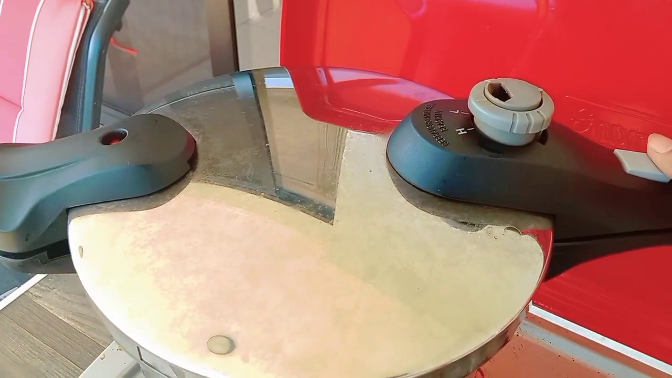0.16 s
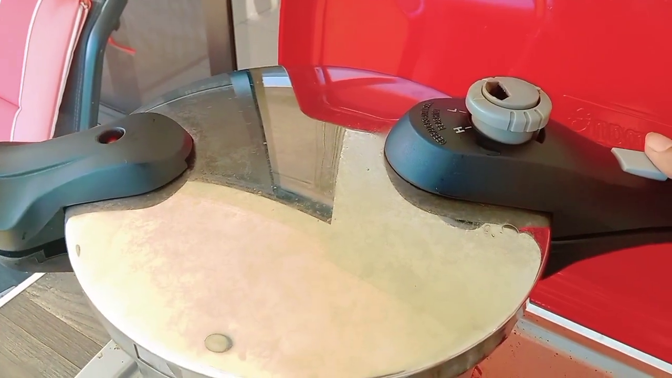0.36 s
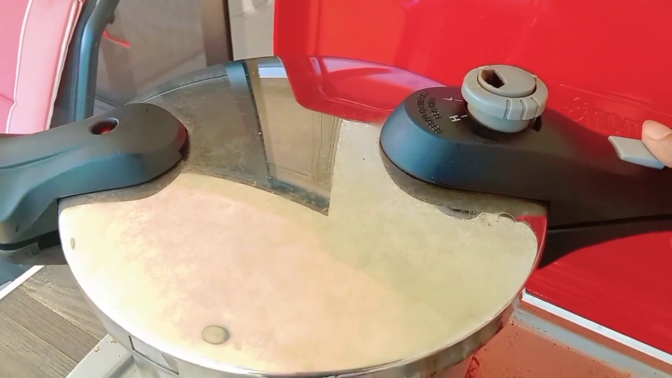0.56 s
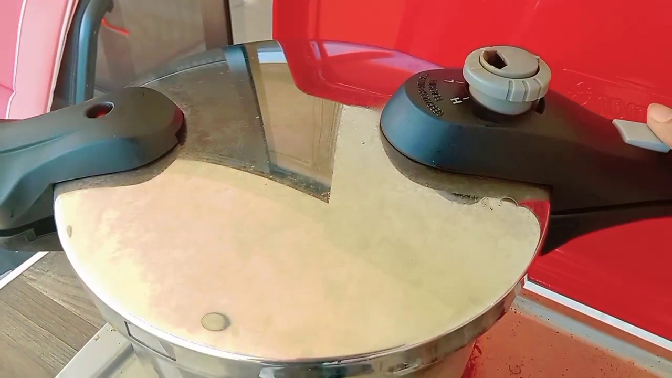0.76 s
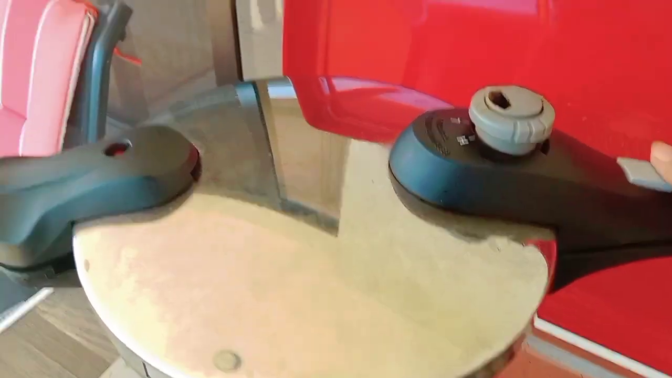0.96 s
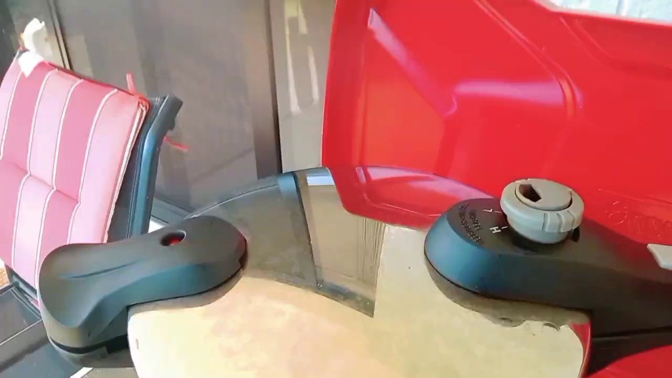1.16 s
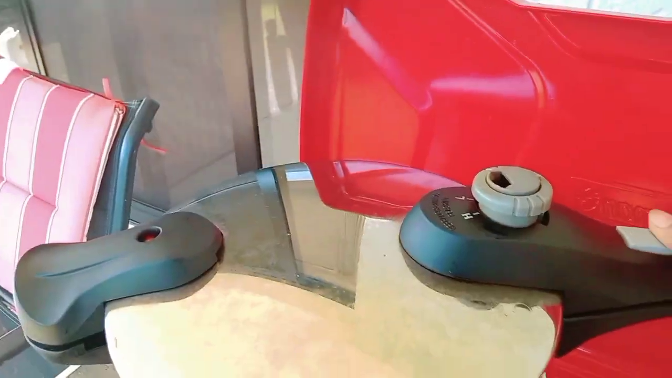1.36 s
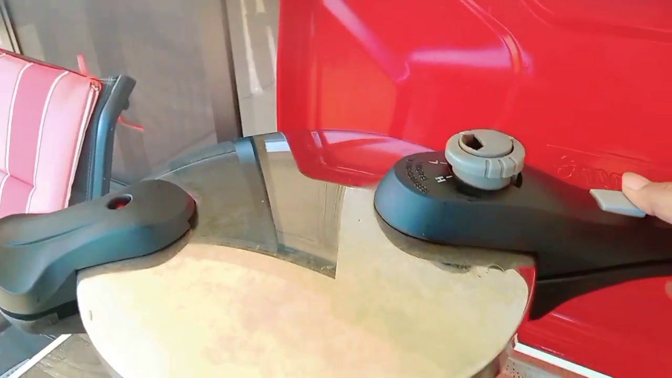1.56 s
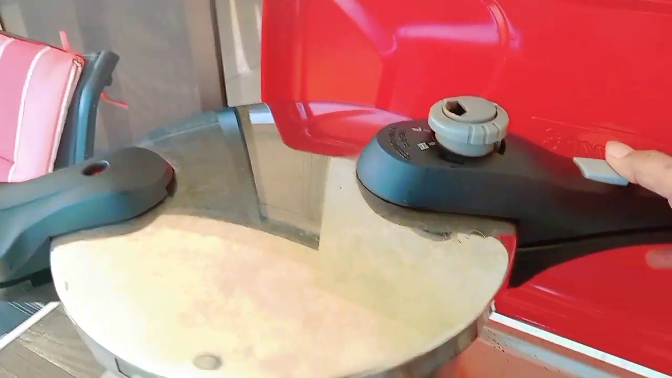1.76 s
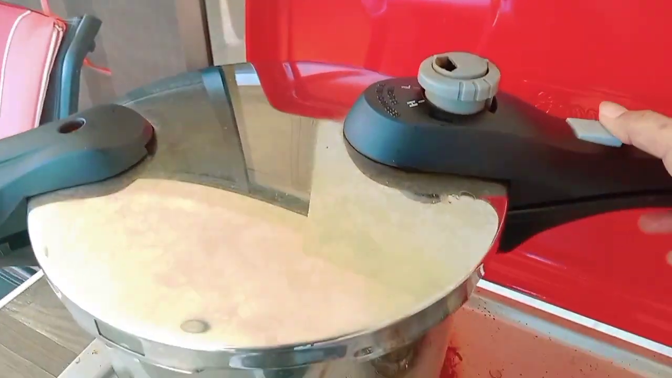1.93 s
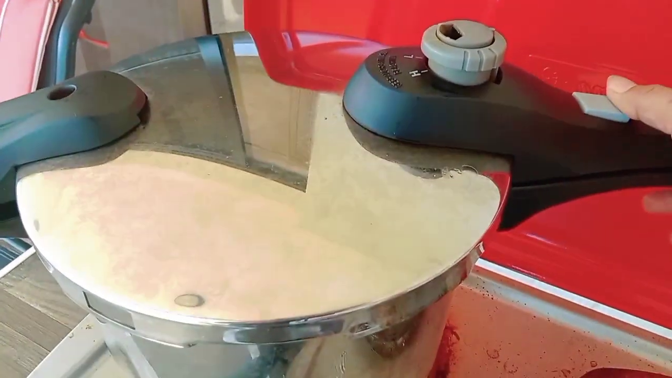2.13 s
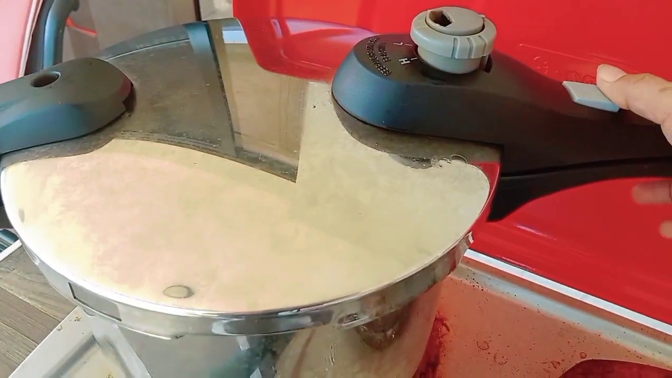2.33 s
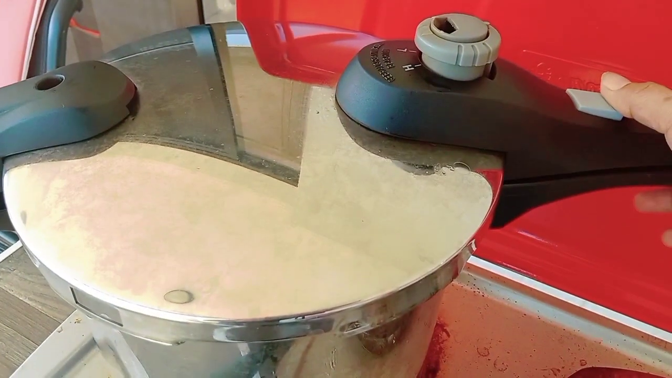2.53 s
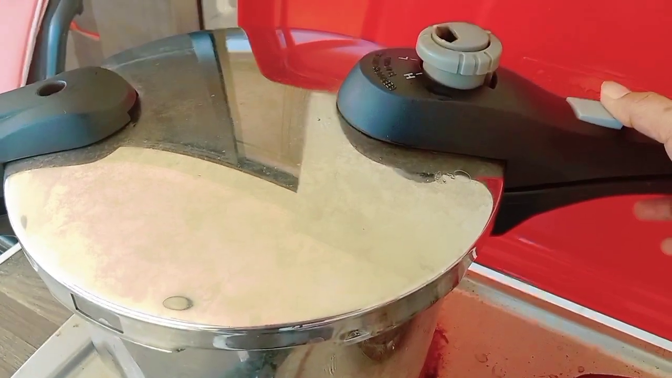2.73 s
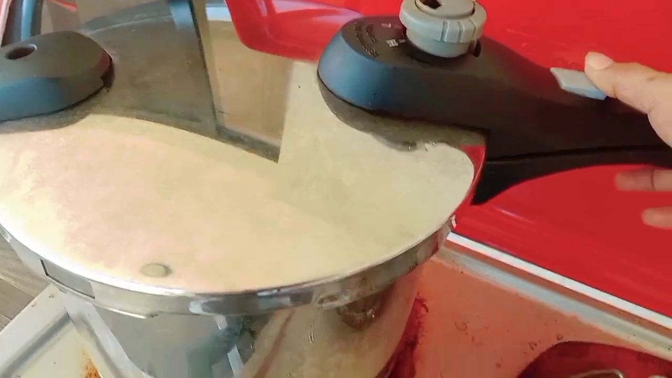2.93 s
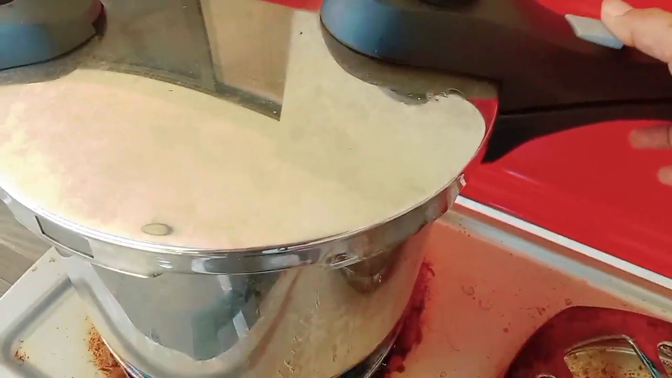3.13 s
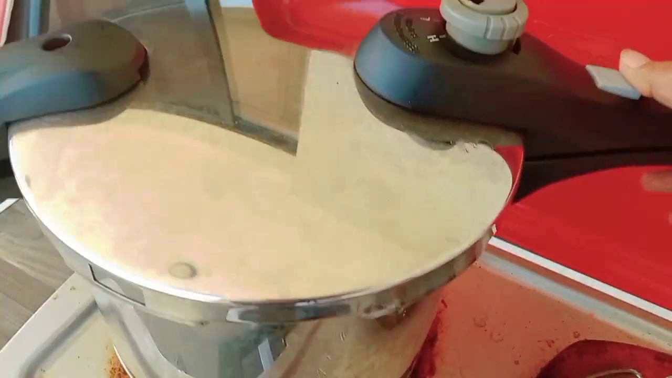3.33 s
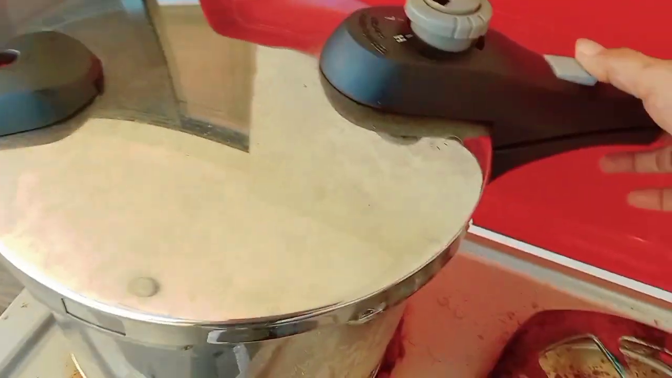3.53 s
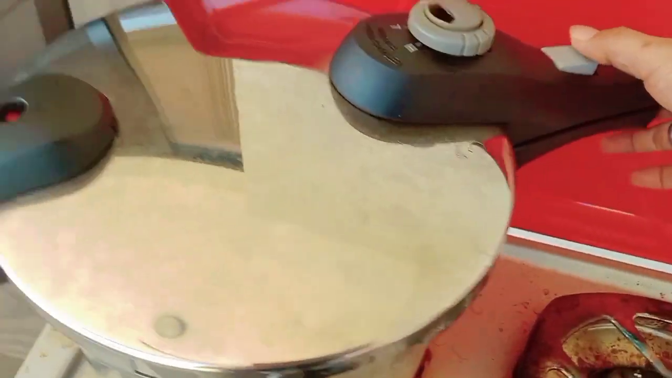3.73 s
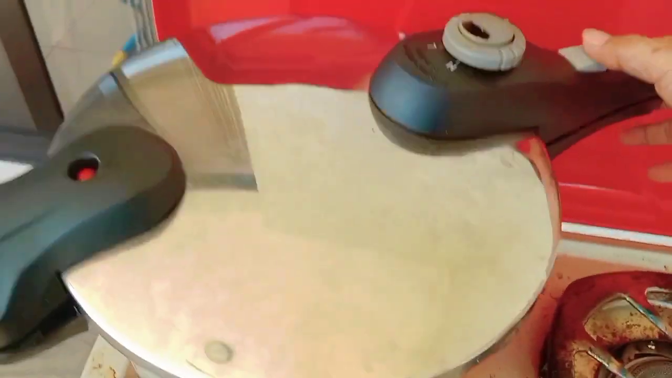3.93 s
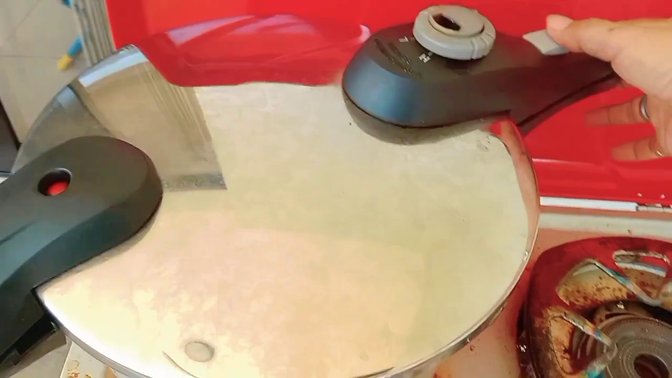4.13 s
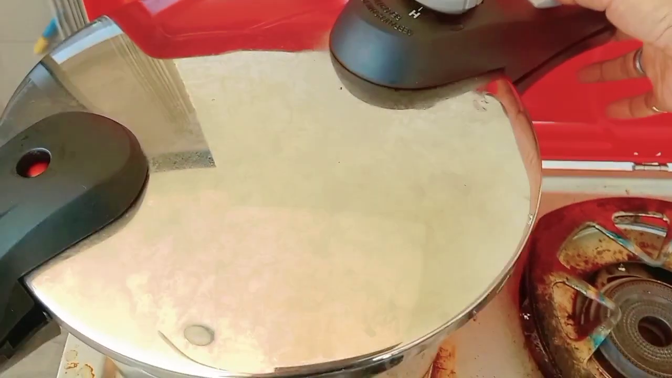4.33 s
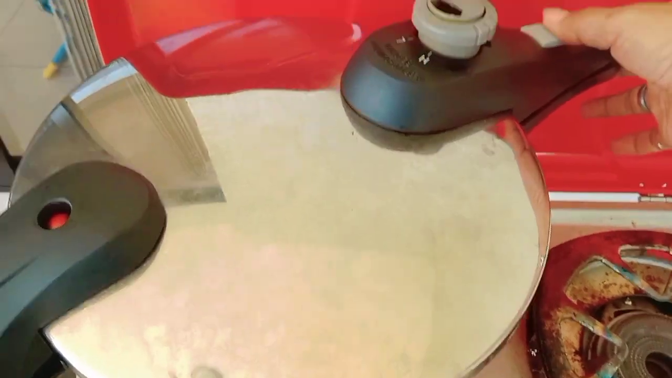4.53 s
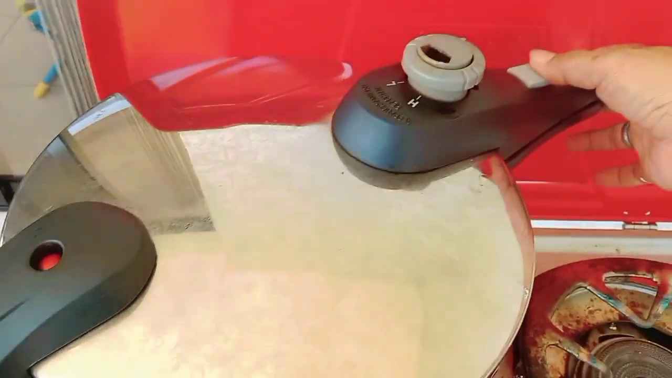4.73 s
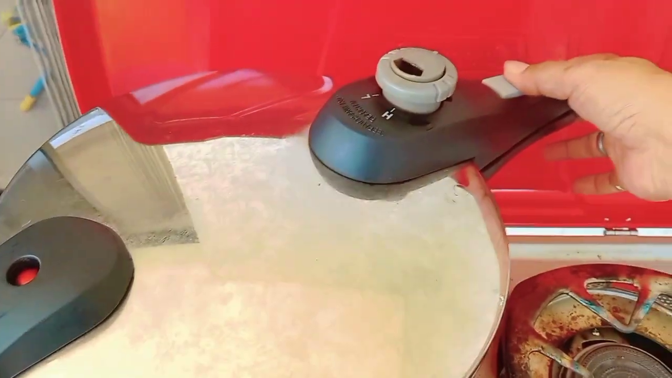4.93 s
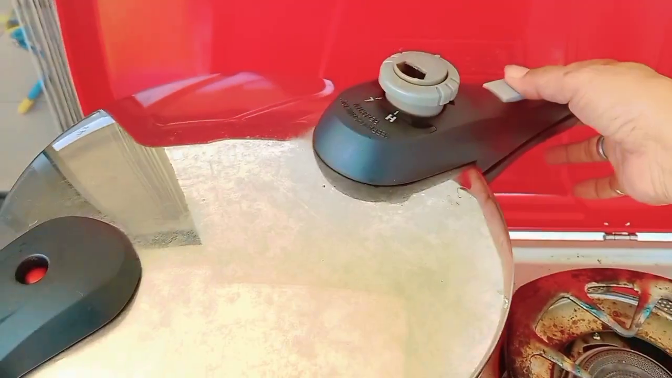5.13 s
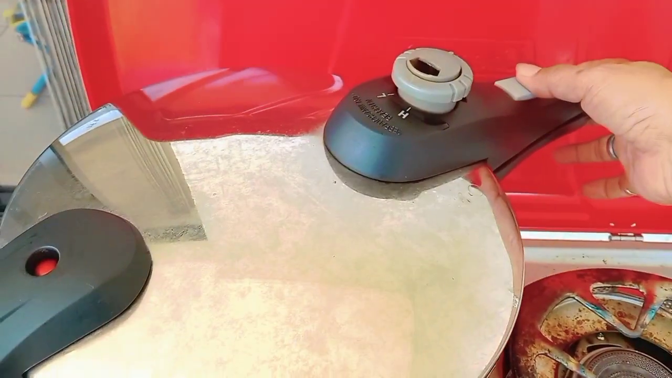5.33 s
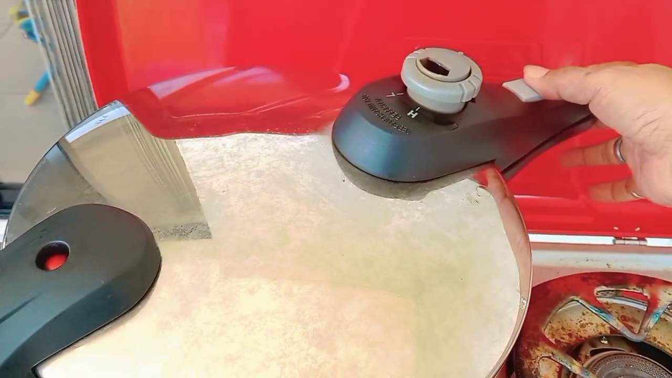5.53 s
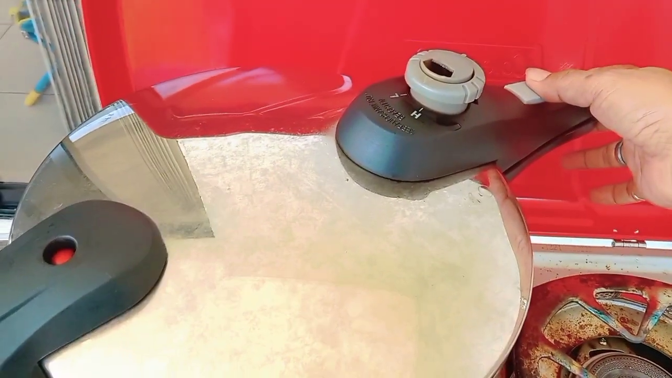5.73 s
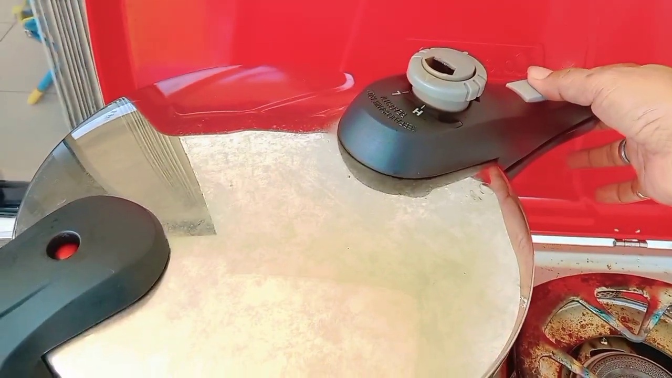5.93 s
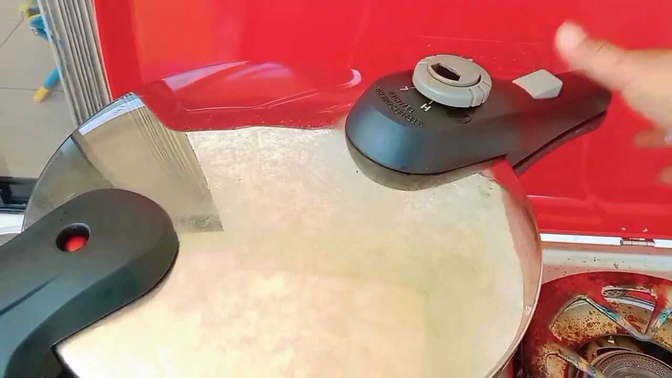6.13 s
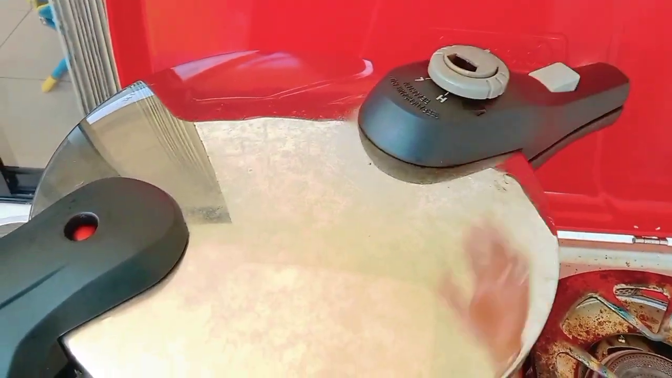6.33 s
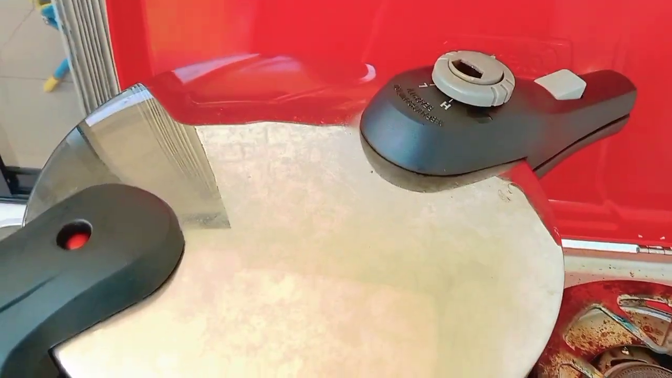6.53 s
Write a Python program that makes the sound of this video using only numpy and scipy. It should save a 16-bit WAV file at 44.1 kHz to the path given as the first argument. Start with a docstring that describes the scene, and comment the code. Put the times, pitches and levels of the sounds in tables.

```python
"""Steam blasts from a stovetop pressure cooker in a small kitchen, a long one then a shorter one, let out by hand on
the release slider. Coloured noise and noise-driven resonances make the hiss through the cavities of the valve cap.
Half open, the valve rasps: unsteady noise in short surges. It clacks shut after each blast: noise cracks, a ringing pot.
A hand-held mono microphone moves about close to the lid, so a reflection and a shadow in the treble wander.
Around it lie a short room tail, faint handling bumps and a quiet room tone."""
import sys
import numpy as np
from scipy import signal
from scipy.fft import rfft, irfft, next_fast_len
from scipy.io import wavfile

SR = 44100
rng = np.random.default_rng(int(sys.argv[2]) if len(sys.argv) > 2 else 0)


def generate_wav(sig):
    """Save sig (samples, or channels by samples) to the path in sys.argv[1] as 16-bit PCM at SR."""
    pcm = np.round(np.clip(np.atleast_2d(sig).T, -1, 1) * 32767).astype(np.int16)
    wavfile.write(sys.argv[1], SR, pcm)


N = 294588
TIME = np.arange(N) / SR


def from_db(db):
    """Decibels to gain."""
    return 10 ** (np.asarray(db) / 20)


def rms_one(x):
    """Scale to unit rms."""
    return x / np.sqrt(np.mean(x ** 2) + 1e-20)


def at_hz(points, hz):
    """Read a two-column table on a log-frequency axis."""
    points = np.array(points)
    return np.interp(np.log(hz + 1), np.log(points[:, 0]), points[:, 1])


def noise(spectrum):
    """White noise shaped by a spectrum table, rms 1."""
    size = next_fast_len(N, True)
    gain = from_db(at_hz(spectrum, np.fft.rfftfreq(size, 1 / SR)))
    white = rng.standard_normal(size)
    return rms_one(irfft(rfft(white) * gain, size)[:N])


def flutter(rate, depth_db):
    """A gain that wavers between random levels, `rate` of them a second, spread by depth_db."""
    knots = rng.standard_normal(N // 20)
    return from_db(depth_db * np.interp(TIME * rate, np.arange(len(knots)), knots))


def blown(modes):
    """Turbulence drives each resonance: white noise through two equal peak filters; the sum has rms 1."""
    out = 0
    for hz, half_width, db in modes:
        b, a = signal.iirpeak(hz, hz / (2 * half_width), fs=SR)
        once = signal.lfilter(b, a, rng.standard_normal(N))
        out = out + from_db(db) * rms_one(signal.lfilter(b, a, once))
    return rms_one(out)


def ring(clicks, hz, t60):
    """A unit click sets a sine of about unit height ringing, 60 dB down after t60 seconds."""
    radius = from_db(-60 / (t60 * SR))
    angle = 2 * np.pi * hz / SR
    # the tiny offset keeps the filter clear of vanishing numbers
    return signal.lfilter([0, np.sin(angle)], [1, -2 * radius * np.cos(angle), radius ** 2], clicks + 1e-18)


def valve_opening(opens, shuts, open_s=0.016, shut_s=0.0073):
    """The valve eases open and drops shut, 0-1, with these time constants of its travel."""
    easing_open = 0.5 * (1 + np.tanh((TIME - opens) / (2 * open_s)))
    return easing_open * np.exp(-np.maximum(TIME - shuts, 0) / shut_s)


# the microphone's path over the lid: (time [s], delay of the hob-cover echo [ms], treble shadow [Hz],
# shadow depth [0-1], nearness to the jet [dB], relative ring of the cap's slot [dB])
MIC_PATH = [(0, 3.42, 9070, 0.5, 0, -7), (1.25, 2.8, 8400, 0.65, 0.4, -6.5), (1.6, 2.95, 9600, 0.57, 0, -8),
            (1.95, 3.26, 10840, 0.47, 0, -14), (2.9, 2.83, 11300, 0.25, 0, -30),
            (3.1, 2.64, 12500, 0.37, -0.7, -30), (3.36, 3.25, 9400, 0.6, 0.6, -6.5),
            (3.7, 2.6, 9050, 0.3, 0, -7.5), (4.3, 3.16, 10400, 0.14, 0, -35.5),
            (6.0, 3.56, 10200, 0.1, 0.12, -35)]


def along_path():
    """The columns of the microphone's path, drawn as straight lines between its points."""
    s, *columns = np.transpose(MIC_PATH)
    return [np.interp(TIME, s, column) for column in columns]


# the valve held open: (opens [s], shuts [s], relative hiss level at opening [dB], sag [dB per s],
# relative sizzle level [dB], extra roar at opening [dB])
BLASTS = [(-0.3, 3.671, -19.5, 1.05, -2.5, 22.5), (4.292, 6.048, -21.5, 0.0, -0.6, 4.5)]
# hiss colour, one table a blast: (frequency [Hz], relative level per Hz [dB])
HISS_COLOURS = [
    [(200, -42.5), (520, -41.5), (800, -38.5), (1300, -34), (1620, -15), (2100, -20.5), (2900, -8),
     (3800, -5.5), (4600, -5), (5900, -1.5), (7500, -7), (8200, -11), (11000, -16), (13500, -10)],
    [(200, -34.5), (520, -37.5), (800, -29), (1300, -17.5), (1800, -18), (2500, -12.5), (3100, -7.5),
     (4500, -4), (5650, 1.5), (7600, -5.5), (8200, -12.5), (10000, -13.5), (10900, -15), (13000, -12)],
]
# cavities of the valve cap, one table a blast: (frequency [Hz], half-width 6 dB down [Hz], relative level [dB])
CAP_MODES = [
    [(1030, 100, -26.5), (1287.5, 46, -20.5), (1583, 98, -16.5), (2900, 150, -15.5), (3594, 197, -5),
     (3940, 210, -2), (5450, 200, -3.5), (5925, 210, 2), (6360, 190, -6.5), (7230, 210, -4),
     (10810, 180, -13.5)],
    [(1280, 23, -12.5), (1608, 160, -14), (2174, 150, -13), (2927, 110, -8.5), (3154, 100, -7),
     (3500, 260, -3.5), (3925, 150, -3), (4780, 140, -13), (5394, 200, 3), (5860, 230, 3), (6490, 170, -2),
     (7520, 120, -7), (10800, 280, -10)],
]
# the cap's slot: (frequency [Hz], half-width 6 dB down [Hz], relative level [dB])
SLOT_MODES = [(4665, 340, -6), (5134, 120, -3.5)]
# sizzle at the very top: (frequency [Hz], relative level per Hz [dB])
SIZZLE_COLOUR = [(11500, -39.5), (13000, -12.5), (14100, 4.5), (14800, 12.5), (15450, 13), (17000, -29)]
# low roar: (frequency [Hz], relative level per Hz [dB])
ROAR_COLOUR = [(300, -33.5), (520, -26.5), (750, -3), (980, 4.5), (1200, -1.5), (1800, -38)]
# rumble under the steam: (frequency [Hz], relative level per Hz [dB])
RUMBLE_COLOUR = [(20, -37), (45, -18), (80, -0.5), (140, -2.5), (280, -0.5), (600, -12), (1200, -25)]


def jet(hiss_db=-2.0, cap_db=-4.5, sizzle_db=1.3, rumble_db=-54.0):
    """Turbulent steam: hiss, cap resonances, sizzle and low roar sag with the pressure and tremble with the flow."""
    sizzle_late_db, sizzle_build_s = 12.5, 0.3  # the sizzle starts this much weaker and builds as the jet forms
    roar_db, roar_settle_s = -40.5, 1.36  # the roar settles to this relative level, with this time constant
    sizzle_shadow_db = 3  # loss of the sizzle in full shadow
    _, _, shadow, near_db, slot_db = along_path()
    slot = from_db(slot_db) * blown(SLOT_MODES)
    roar = noise(ROAR_COLOUR)
    rumble = from_db(rumble_db) * noise(RUMBLE_COLOUR)
    sizzle = from_db(sizzle_db - sizzle_shadow_db * shadow) * noise(SIZZLE_COLOUR)
    sizzle = sizzle * flutter(rate=90, depth_db=0.9) * flutter(rate=6.6, depth_db=0.5)
    out = 0
    for blast, colour, modes in zip(BLASTS, HISS_COLOURS, CAP_MODES):
        opens, shuts, db, sag, top_db, surge_db = blast
        age = np.maximum(TIME - opens, 0)
        flow = valve_opening(opens, shuts) * from_db(db - sag * age)
        hiss = from_db(hiss_db) * noise(colour) + from_db(cap_db) * blown(modes) + slot
        still_to_build = np.maximum(1 - age / sizzle_build_s, 0)
        top = from_db(top_db - sizzle_late_db * still_to_build) * sizzle
        low = from_db(roar_db + surge_db * np.exp(-age / roar_settle_s)) * roar + rumble
        out = out + flow * (hiss + top + low)
    return out * from_db(near_db) * flutter(rate=60, depth_db=0.67)


# notches that slide together: (multiple of the shadow frequency, width [Hz], share of the shadow depth)
NOTCHES = [(.385, 200, .9), (.44, 400, .9), (1.0, 1300, 1.0), (1.53, 1300, .8)]
# nearby surfaces: (path length as a multiple of the hob-cover echo, gain)
ECHOES = [(1.0, 0.22), (.91, -0.078), (.56, 0.059), (1.48, 0.15)]


def moving_microphone(x, size=256):
    """Nearby surfaces comb the hiss, and notches slide through it as the microphone moves."""
    echo_ms, shadow_hz, depth, _, _ = along_path()
    delay = echo_ms / 1000
    x = x + sum(gain * np.interp(TIME - length * delay, TIME, x, left=0) for length, gain in ECHOES)
    for multiple, width, share in NOTCHES:
        band, state = np.zeros(N), np.zeros(2)
        for i in range(0, N, size):  # the filter is retuned block by block
            hz = multiple * shadow_hz[i]
            b, a = signal.iirpeak(hz, hz / width, fs=SR)
            band[i:i + size], state = signal.lfilter(b, a, x[i:i + size], zi=state)
        x = x - np.clip(share * depth, 0, 1) * band
    return x


# the valve passes half open: (peak time [s], relative peak level [dB], swell [s], decay time constant [s])
RASPS = [(3.688, -28.5, 0.1, 0.006), (4.285, -38.5, 0.03, 0.11), (4.388, -22, 0.06, 0.034),
         (4.432, -16, 0.04, 0.0096), (6.05, -31, 0.045, 0.005)]
# resonances of the valve: (frequency [Hz], half-width 6 dB down [Hz], relative level [dB])
VALVE_MODES = [(485, 35, -20), (1267, 81, -3.5), (1470, 90, -4), (3150, 250, -8), (5250, 110, -17),
               (6500, 100, -15), (7890, 65, -11.5), (11300, 300, -14), (12360, 340, -6.5)]
# breath of the rasp: (frequency [Hz], relative level per Hz [dB])
RASP_COLOUR = [(150, -36), (330, -26), (470, -3.5), (650, -12), (900, 1.5), (1400, -5.5), (2200, -3.5),
               (4000, -10), (7800, -6), (9500, -7), (12400, -6.5), (15000, -15)]


def rasp(modes_db=0.0, breadth_db=-3.0):
    """Steam squeezes past the half-seated valve and shakes it unevenly, in surges that swell and die."""
    voice = from_db(modes_db) * blown(VALVE_MODES) + from_db(breadth_db) * noise(RASP_COLOUR)
    squeeze = 0
    for peak, db, swell, decay in RASPS:
        rise = np.clip(1 + (TIME - peak) / swell, 0, 1) ** 2
        fall = np.exp(-np.maximum(TIME - peak, 0) / decay)
        squeeze = squeeze + from_db(db) * rise * fall
    return squeeze * voice * flutter(rate=220, depth_db=2.5)


# valve and slider snapping shut: (time [s], relative crack level [dB], relative thud level [dB])
CLACKS = [(3.688, -12, -29.5), (3.7105, -25.5, -26), (3.93, -63, -78.5), (6.0752, -10.5, -25),
          (6.1049, -14.5, -24.5)]
# crack: (frequency [Hz], relative level per Hz [dB])
CRACK_COLOUR = [(100, -18), (500, -6.5), (1400, 4.5), (2200, 0.5), (3200, -13.5), (5800, 6), (8000, -3),
                (10000, -6.5), (13000, 4.5), (15500, -11)]
# pot and hob ringing: (frequency [Hz], relative level [dB], t60 [s])
POT_MODES = [(139.8, -19.5, 0.4), (203, -26, 0.29), (337.4, -10, 0.21), (372, -23, .1), (475, -9.5, 0.2),
             (507, -2, 0.14), (579, -3.5, 0.098), (668, -14.5, 0.12), (807, -14.5, 0.17),
             (1300, -5.5, 0.068), (1496, 2, 0.043), (2080, -8, 0.053)]
# dull thump of the pot on the hob: (frequency [Hz], relative level per Hz [dB])
THUMP_COLOUR = [(30, -43.5), (70, -13.5), (135, -3), (190, -6.5), (330, 4), (520, 1.5), (750, -14),
                (1000, -24), (2000, -24)]


def clacks(crack_decay=0.0033, rattle_decay=0.014, rattle_db=-16.5,
           thump_db=-10.0, thump_rise=0.025, thump_decay=0.034):
    """Each blow is a sharp crack with a short plastic rattle; the pot rings and thumps on the hob."""
    bounce_s, bounce_loss_db = 0.0083, 12.5  # every blow bounces once
    bounces = np.add(CLACKS, [bounce_s, -bounce_loss_db, -bounce_loss_db])
    blows = np.vstack([CLACKS, bounces])
    crack, thump, pot = np.zeros((3, N))
    for start, sharp_db, dull_db in blows:
        age = np.maximum(TIME - start, 0)
        snap = np.exp(-age / crack_decay) + from_db(rattle_db) * np.exp(-age / rattle_decay)
        crack += from_db(sharp_db) * (age > 0) * snap
        thump_shape = (1 - np.exp(-age / thump_rise)) * np.exp(-age / thump_decay)
        thump += from_db(dull_db + thump_db) * thump_shape
    s, _, thud_db = blows.T
    for hz, db, t60 in POT_MODES:
        clicks = np.zeros(N)
        lag = rng.uniform(0, 0.00301, len(s))  # the blow spreads through lid and pot
        strike_db = thud_db + db + rng.standard_normal(len(s))
        clicks[((s + lag) * SR).astype(int)] = from_db(strike_db)
        pot += ring(clicks, hz, t60)
    # a small body radiates little deep bass
    bass_cut = signal.butter(2, 130, "high", fs=SR, output="sos")
    body = signal.sosfilt(bass_cut, crack * noise(CRACK_COLOUR) + pot)
    return body + thump * noise(THUMP_COLOUR)


# soft bumps of handling: (start [s], relative peak level [dB])
BUMPS = [(2.12, -63), (2.63, -65), (6.53, -72)]
# bump: (frequency [Hz], relative level per Hz [dB])
BUMP_COLOUR = [(20, -10), (70, 0), (150, -11), (400, -23), (1500, -62)]


def handling(swell=0.012):
    """Faint low bumps of noise, each at its peak `swell` seconds after it starts, then fading."""
    envelope = 0
    for start, db in BUMPS:
        age = np.maximum(TIME - start, 0) / swell
        envelope = envelope + from_db(db) * age * np.exp(1 - age)
    return envelope * noise(BUMP_COLOUR)


# decay of the kitchen: (frequency [Hz], t60 [s])
KITCHEN_T60 = [(100, 0.5), (250, .36), (500, .22), (1500, 0.15), (3500, .11), (5000, 0.16), (6800, 0.22),
               (10000, 0.17), (14000, .12)]


def kitchen(x, wet_db=-8.5, boom_db=4.5, boom_hz=600, first_echo=0.0053):
    """A diffuse tail of decaying noise bands, stronger in the bass and longest there."""
    t, response = TIME[:SR], 0
    edges = np.geomspace(40, 18000, 11)
    for low, high in zip(edges, edges[1:]):
        hz = np.sqrt(low * high)
        band_pass = signal.butter(2, [low, high], "band", fs=SR, output="sos")
        band = signal.sosfilt(band_pass, rng.standard_normal(SR))
        decay = from_db(-60 * t / at_hz(KITCHEN_T60, hz)) * (t > first_echo)
        level = from_db(wet_db + boom_db / (1 + (hz / boom_hz) ** 2))
        response = response + band * decay / np.linalg.norm(decay) * level
    return x + signal.fftconvolve(x, response)[:N]


# room tone: (frequency [Hz], relative level per Hz [dB])
ROOM_COLOUR = [(20, -22.5), (60, -14), (130, -13), (280, -8), (340, -21), (650, -24), (1080, -15),
               (1700, -16.5), (2300, -28), (7300, -31.5), (7850, -19), (10500, -27), (12000, -46.5)]


def room_tone(level_db=-72.5):
    """Steady coloured noise under everything."""
    return from_db(level_db) * noise(ROOM_COLOUR)


def scene():
    """Cooker, kitchen, handling and room tone, the same in both channels."""
    cooker = moving_microphone(jet()) + rasp() + clacks()
    mono = kitchen(cooker) + handling() + room_tone()
    return np.array([mono, mono])


def record(dry, cutoff_hz=15450):
    """The top is cut steeply by an elliptic low-pass."""
    return signal.sosfilt(signal.ellip(12, 0.2, 90, cutoff_hz, fs=SR, output="sos"), dry)


dry = scene()
out = record(dry)
generate_wav(out)
```